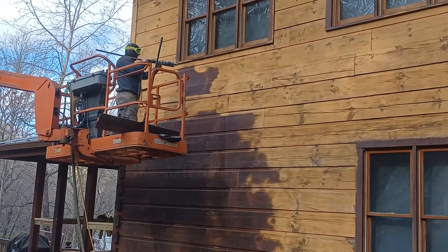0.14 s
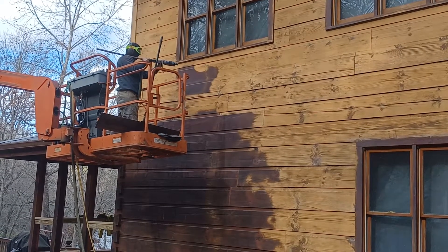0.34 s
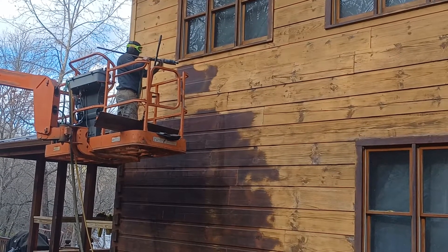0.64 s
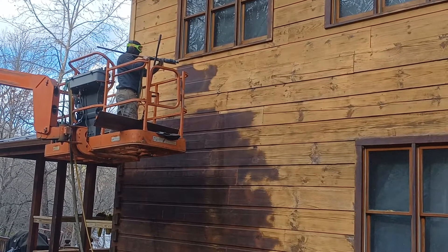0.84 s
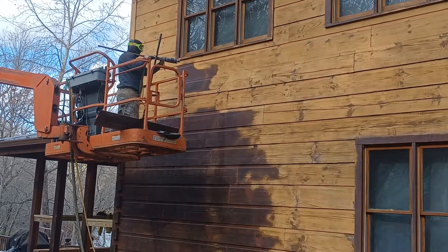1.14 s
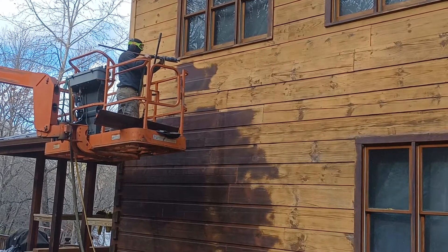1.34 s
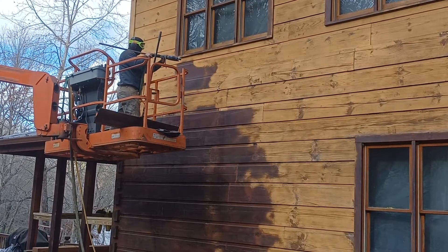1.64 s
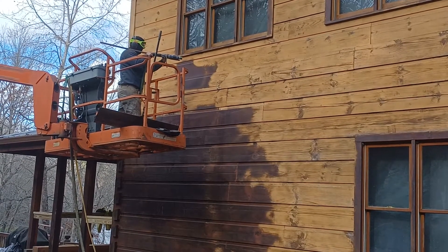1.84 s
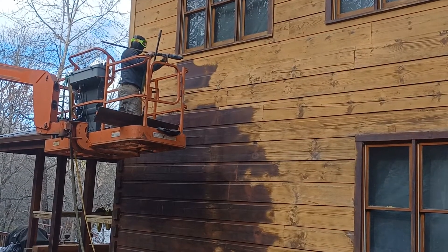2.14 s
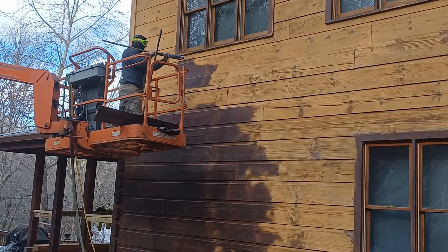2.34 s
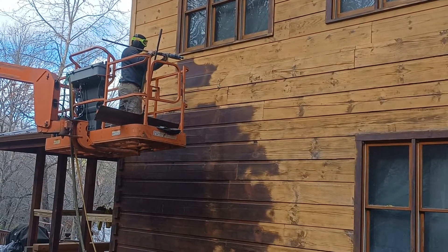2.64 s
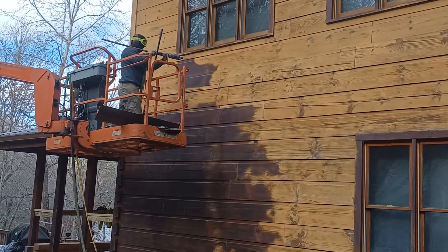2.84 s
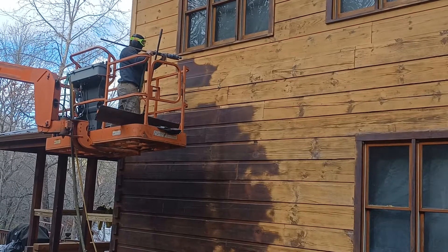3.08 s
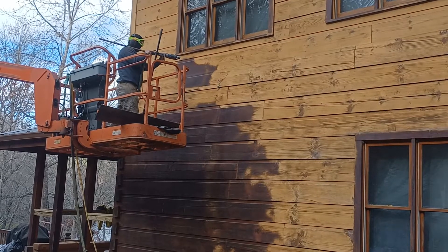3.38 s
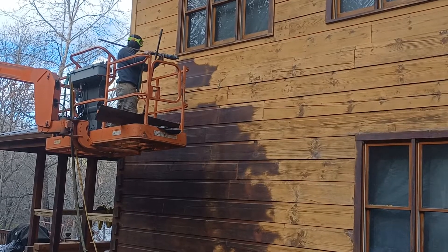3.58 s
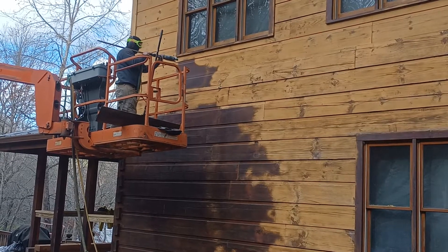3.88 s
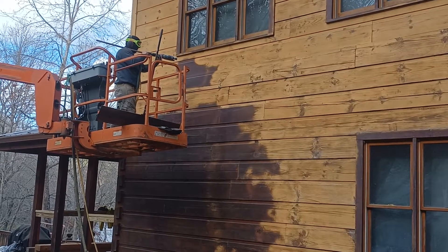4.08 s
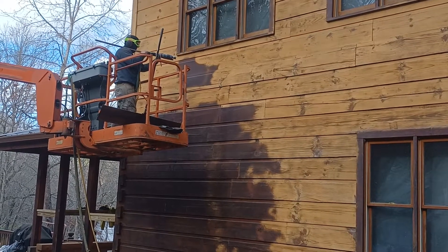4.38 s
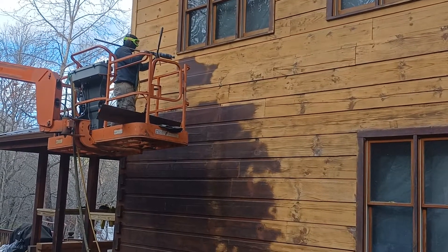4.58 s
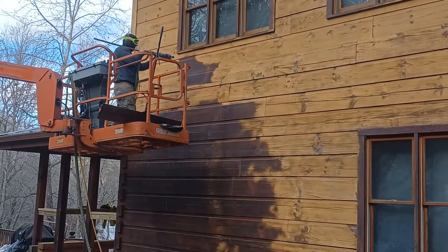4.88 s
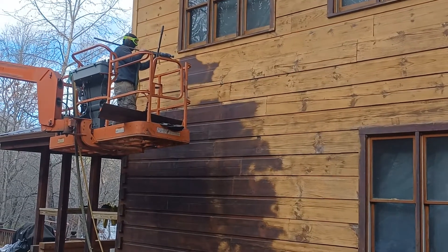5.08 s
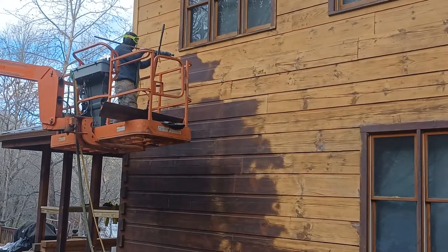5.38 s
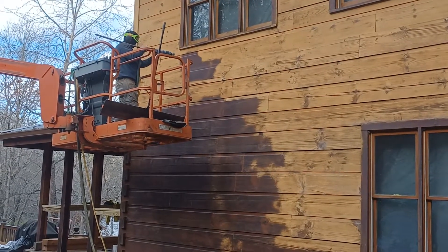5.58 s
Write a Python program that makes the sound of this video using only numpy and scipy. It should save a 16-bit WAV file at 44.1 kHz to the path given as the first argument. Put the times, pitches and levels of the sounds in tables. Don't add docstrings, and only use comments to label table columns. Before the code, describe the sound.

A dense, steady hiss of air and grit sprays loudly outdoors, over a faint, constant low engine drone.

```python
import sys
import numpy as np
from scipy import signal
from scipy.fft import rfft, irfft
from scipy.io import wavfile
from scipy.ndimage import uniform_filter1d, map_coordinates

SR = 44100
rng = np.random.default_rng(int(sys.argv[2]) if len(sys.argv) > 2 else 0)


def invert_db(level):
    return 10 ** (np.asarray(level, dtype=float) / 20)


def output_pcm(signal):
    pcm = np.clip(np.atleast_2d(signal).T, -1, 1) * 32767
    wavfile.write(sys.argv[1], SR, np.round(pcm).astype(np.int16))


N = 252252

# time in seconds, jet level in dB.
JET_FLOW = [
    (0, -18.5),
    (.6, -18),
    (1.4, -18),
    (2.2, -17),
    (3.3, -18.5),
    (3.8, -17.5),
    (4.7, -17),
    (5.1, -18),
    (5.4, -17.5),
    (5.72, -18),
]
# time in seconds, turn in arbitrary units.
CAMERA_TURN = [
    (.5, -1.03),
    (2.1, -0.15),
    (3.1, -0.4),
    (4.5, 0.53),
    (5.0, -0.12),
    (5.5, 1.27),
]
# delay in ms, gain (signed ratio), upper limit of reflection in Hz.
LEFT_REFLECTIONS = [(0.644, -0.32, 4300), (0.96, -0.42, 2700), (1.307, -0.39, 2300), (1.732, -0.15, 3400),
                    (1.986, 0.5, 2600), (1.991, -0.24, 6400), (2.552, -0.31, 1300), (3.12, -0.08, 4900),
                    (3.418, -0.12, 6300), (3.524, -0.09, 11400), (3.807, 0.33, 6900), (3.858, -0.3, 4700),
                    (4.093, -0.12, 7300), (4.533, -0.4, 1300)]
RIGHT_REFLECTIONS = [(0.89, -0.13, 6300), (1.046, -0.07, 10100), (1.488, -0.31, 2000), (1.618, 0.25, 2500),
                     (2.083, 0.35, 2000), (2.914, 0.07, 4000), (3.643, -0.06, 10100), (3.803, 0.18, 6800),
                     (3.921, -0.12, 5200), (4.115, -0.15, 8200), (4.369, -0.1, 6400), (4.678, -0.42, 1700),
                     (5.208, -0.14, 2600), (5.639, -0.09, 3400)]
# frequency in Hz, density in dB per Hz, change in dB per unit of turn.
LEFT_PORT = [(380, -21.5, -.2), (1000, -7.3, -.8), (1900, -1, -1.3), (2500, -9.3, -3.5), (3050, -5.7, 1.3),
             (3900, -1, .9), (5500, -2.8, .5), (6600, -4.2, -1.2), (7800, -10, 3.5), (9700, -3.6, -.5),
             (10600, -10.8, .9), (12300, 2.6, -.1), (13500, 3.4, -.7), (15700, -4.4, -.7)]
RIGHT_PORT = [(380, -19.5, -1.5), (700, -8.8, -.1), (1300, -4.6, -2.9), (2200, -10, -1.1), (3000, -4, 0),
              (4200, 1.4, 1.5), (5400, -.5, -1.2), (6000, -6.5, 2.1), (7300, -3.7, -2.5), (8000, -8.2, 1.5),
              (10500, -10.5, -.5), (11800, -6.4, -.1), (13800, -11.4, 1.2), (15700, -11.8, -.6)]
# frequency in Hz, left-right likeness from 0 to 1, left's lead in radians.
PORT_COHERENCE = [(400, .82, 6.4), (1900, .87, 6.5), (2250, .65, 6.3), (2620, .82, 5.9), (2720, .82, 3.2),
                  (2830, .65, .8), (3300, .72, 1.3), (4100, .93, .5), (5150, .8, 1.4), (5350, .82, 1.2),
                  (5700, .72, 2.1), (6600, .45, 1.2), (7600, .6, 1.9), (8250, .74, 2.6), (10600, .3, 2.4)]
# multiple of the cycle, level in dB, left-right difference in dB, left's lead in radians.
ENGINE_TONES = [(4, -51.5, -1, 1.1), (5, -63, 0, 0), (7, -55.5, -5, .2), (8, -35, 2, .1), (9, -64, 0, 0),
                (10, -60, 0, .2), (11, -62, 0, -.3), (12, -52, -10, 1.4), (13, -42.6, 1, .5),
                (16, -52, 0, .5), (24, -58, 0, 0), (26, -62, 0, .1), (31, -56, -1, .2)]
# frequency in Hz, density in dB per Hz.
ENGINE_RUSH = [(20, -23), (45, -17), (59, -13), (63, 0), (85, -1), (140, -.5), (250, 0), (310, -2),
               (350, -9), (450, -17), (700, -40)]

CYCLE_HZ = 20.45
FRAME = 2048
TOP_HZ = 15750
REVERSE_S, REVERSE_AT, BACK_PER_S, FORWARD_PER_S = 2.55, -.04, .15, .35
TIPPED_S, TIP_PERIOD_S, SPRAY_SWING_DB, ROAR_DB_PER_TRAVEL = 3.05, 5, 2, 0.2
PLATFORM_MS = 2.7
NEAR_SHIFT_LEFT_MS, NEAR_SHIFT_RIGHT_MS, FAR_SHIFT_MS = 0.014, 0.0019, -.085
SLIDE_PER_TURN = .045


def blaster():
    hz, t, z = noise_frames()
    f = hz[:, None]
    stroke = REVERSE_AT + np.where(t < REVERSE_S, -BACK_PER_S, FORWARD_PER_S) * (t - REVERSE_S)
    travel = stroke + .02 * wobble(2.5, t)
    turn = np.interp(t, *np.transpose(CAMERA_TURN))

    pattern_hz = f * (1 - SLIDE_PER_TURN * turn * (f > 6000))
    lead = along(PORT_COHERENCE, pattern_hz, order=2) + hand_sway(f, z.shape[1:])
    pair = at_ports(z, along(PORT_COHERENCE, hz), lead)
    pair = pair * invert_db(eddies_db(z.shape[1:]) + nozzle_angle_db(f, t, stroke))

    left = port(LEFT_PORT, hz, turn) * echoes(LEFT_REFLECTIONS, NEAR_SHIFT_LEFT_MS, hz, travel)
    right = port(RIGHT_PORT, hz, turn) * echoes(RIGHT_REFLECTIONS, NEAR_SHIFT_RIGHT_MS, hz, travel)
    hiss = unit(samples(pair * [left, right]))

    now = np.arange(N) / SR
    flutter_db = .25 * wobble(12, now) + .35 * wobble(28, now)
    flow_db = np.interp(now, *np.transpose(JET_FLOW))
    return invert_db(flow_db + 2.0 + flutter_db) * hiss


def eddies_db(shape):
    return .7 * patches(shape, 30, 3) + 1.1 * patches(shape, 4, 8)


def nozzle_angle_db(f, t, stroke):
    spray_db = -SPRAY_SWING_DB * np.cos(2 * np.pi * (t - TIPPED_S) / TIP_PERIOD_S)
    roar_db = ROAR_DB_PER_TRAVEL * (stroke - stroke.mean())
    return band(f, 1200, 1) * roar_db + band(f, 6500, .3) * spray_db


def band(f, centre, octaves):
    return np.exp(-(np.log2(f / centre + 1e-9) / octaves) ** 2)


def echoes(table, near_shift_ms, hz, travel):
    f = hz[:, None]
    paths = 1
    for ms, gain, top in table:
        shift_ms = near_shift_ms if ms < PLATFORM_MS else FAR_SHIFT_MS
        delay = (ms + travel * shift_ms) / 1000
        paths = paths + gain * np.exp(-(f / top) ** 2 - 2j * np.pi * f * delay)
    return np.abs(paths) ** along([(1500, 1.15), (3500, 1.5)], f)


def port(table, hz, turn):
    table = [(150, -65, 0), *table]
    facing_db = along(table, hz)[:, None]
    return invert_db(facing_db + along(table, hz, order=2)[:, None] * turn)


def hand_sway(f, shape):
    return np.clip(f / 8500, 0, 1) ** 2 * patches(shape, 14, 50)


def at_ports(z, alike, lead):
    turn = np.arccos(np.clip(alike, 0, 1))[:, None] / 2
    common, apart = np.cos(turn) * z[0], np.sin(turn) * z[1]
    half = np.exp(.5j * lead)
    return np.array([(common + apart) * half, (common - apart) / half])


def engine():
    return engine_tones() + engine_rush()


def engine_tones():
    now = np.arange(N) / SR
    turn = 2 * np.pi * np.cumsum(CYCLE_HZ * (1 + .0008 * wobble(2.5, now))) / SR
    sides = np.array([[.5], [-.5]])
    tones = np.zeros((2, N))
    for k, db, pan_db, lead in ENGINE_TONES:
        phase = round(k) * turn + sides * lead
        waver_db = (-24.0 - db) / 15 * wobble(7, now)
        tones += invert_db(db + 3.5 + waver_db + sides * pan_db) * np.cos(phase)
    return tones


def engine_rush():
    hz, t, z = noise_frames()
    pair = at_ports(z, along([(40, 0.66), (130, 0.3), (400, 0.33)], hz), 0)
    spectrum_db = along([(5, -60), *ENGINE_RUSH, (1500, -120)], np.fft.rfftfreq(N, 1 / SR))
    return invert_db(-41.5) * unit(irfft(rfft(samples(pair)) * invert_db(spectrum_db), N))


def noise_frames():
    return signal.stft(rng.standard_normal((2, N + FRAME)), SR, nperseg=FRAME, noverlap=FRAME - FRAME // 4)


def samples(z):
    return signal.istft(z, nperseg=FRAME, noverlap=FRAME - FRAME // 4)[1][:, :N]


def patches(shape, bins, frames):
    across_bins = uniform_filter1d(rng.standard_normal(shape), bins, 0)
    return unit(uniform_filter1d(across_bins, frames, 1))


def wobble(rate, t):
    return map_coordinates(rng.standard_normal(int(N * rate / SR) + 8), [t * rate])


def along(points, hz, order=1):
    table = np.transpose(points)
    return np.interp(np.log(hz + 1), np.log(table[0] + 1), table[order])


def unit(x):
    return x / np.sqrt(np.mean(np.abs(x) ** 2) + 1e-20)


def scene():
    return blaster() + engine()


def top_cut(x):
    return signal.sosfilt(signal.butter(12, 15970, fs=SR, output="sos"), x)


def record(dry):
    passed = np.fft.rfftfreq(N, 1 / SR) < TOP_HZ
    kept = irfft(rfft(dry) * passed, N)
    return top_cut(kept)


dry = scene()
out = record(dry)
output_pcm(out)
```